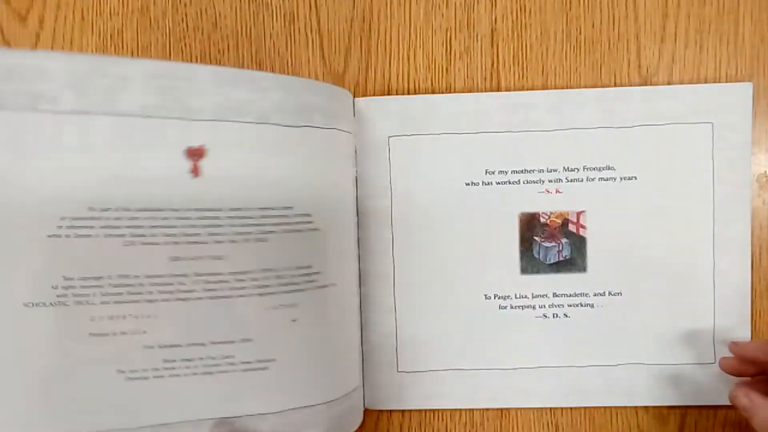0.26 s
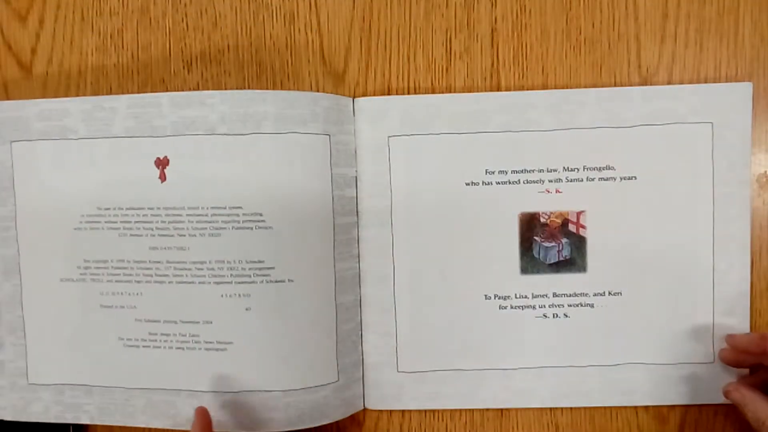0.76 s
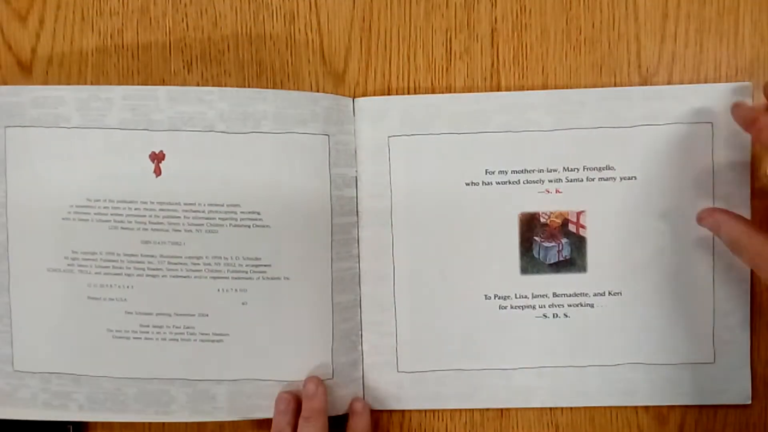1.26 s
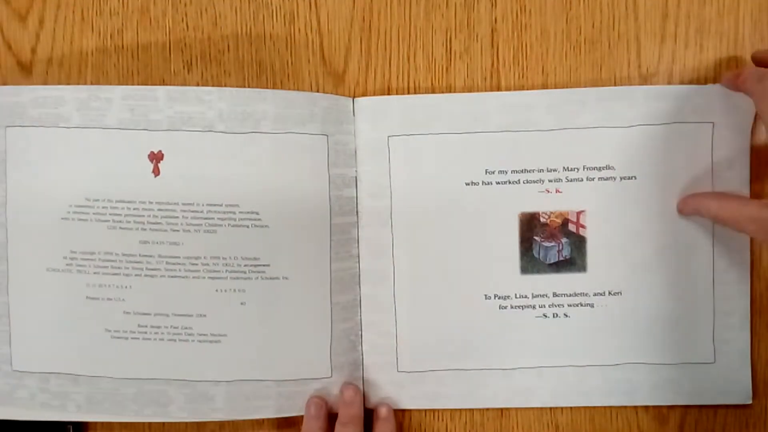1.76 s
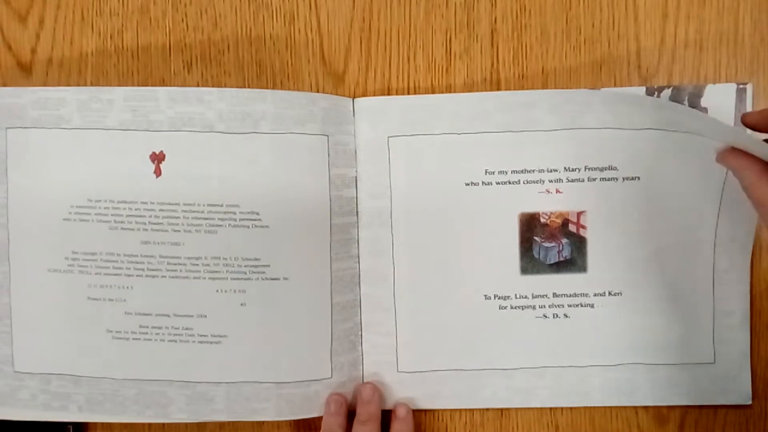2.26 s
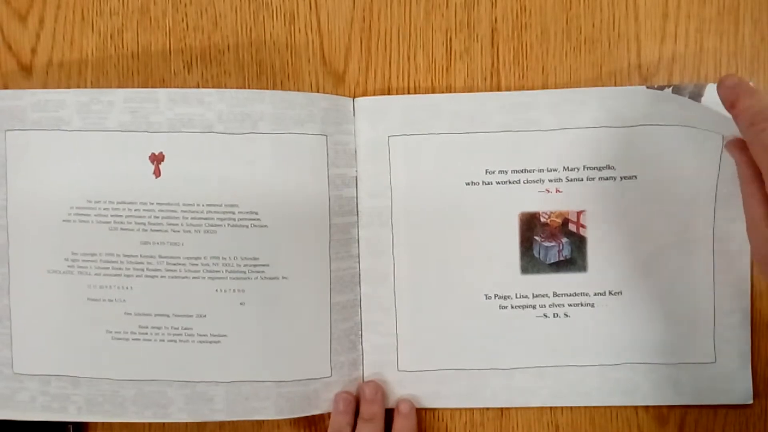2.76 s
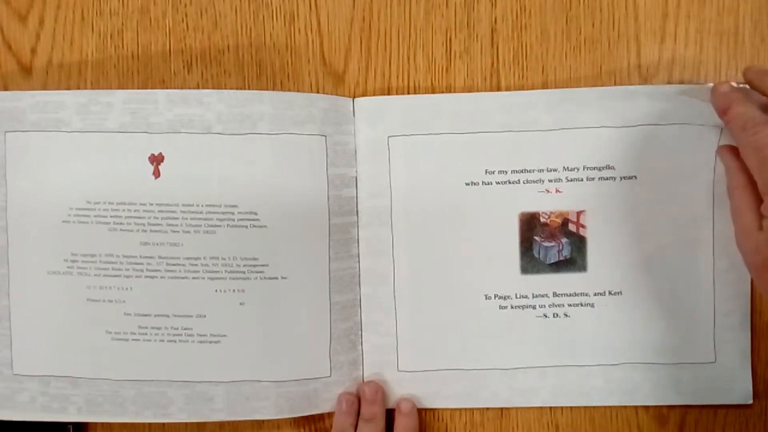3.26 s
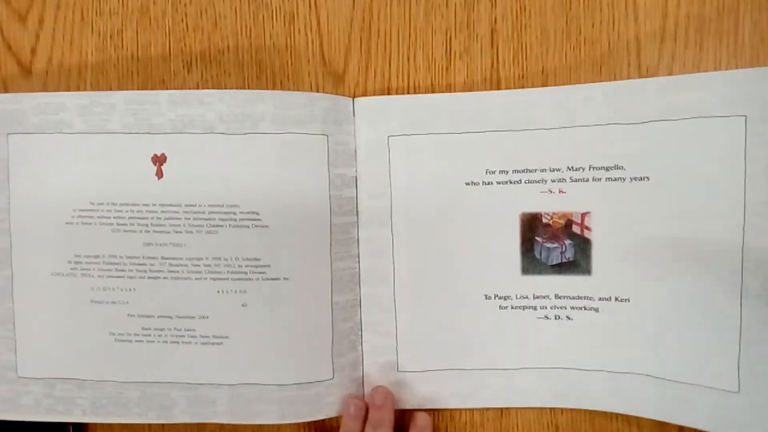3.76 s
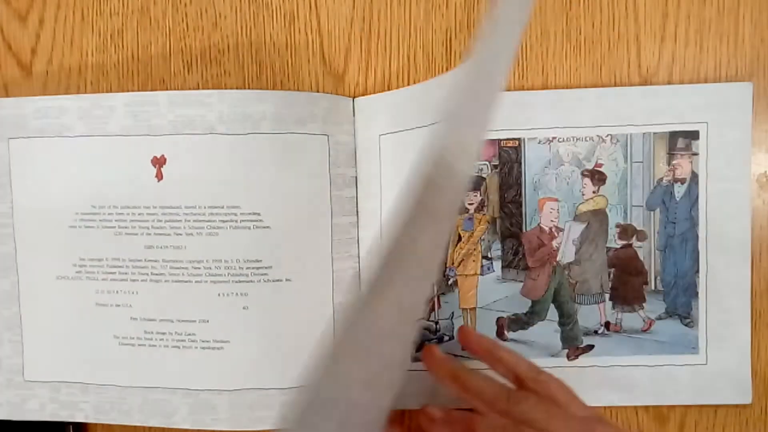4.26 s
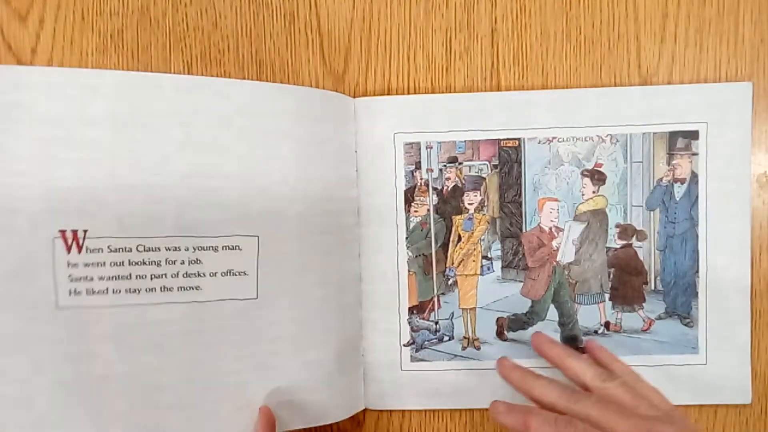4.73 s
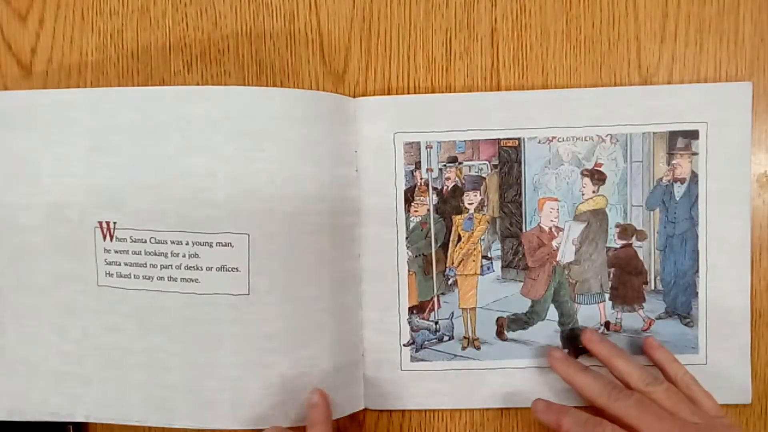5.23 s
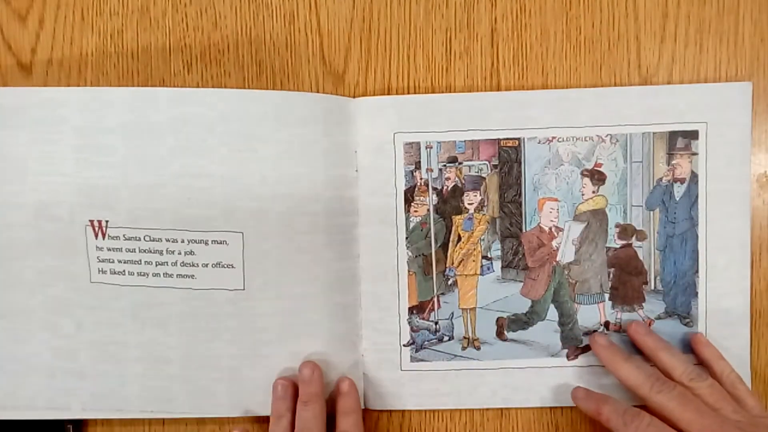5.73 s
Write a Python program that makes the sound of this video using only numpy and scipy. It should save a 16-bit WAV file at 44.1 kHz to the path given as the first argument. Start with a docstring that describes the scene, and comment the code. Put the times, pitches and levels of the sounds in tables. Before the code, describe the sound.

A small quiet room, with a phone microphone close above a book on a wooden table; faint steady hiss and a short soft room tail. A barely audible paper glide opens, then a crisp snap and flutter at 0.7 s as a page settles. Another light flick and scrape come at 1.1 s, followed by soft hand strokes until about 1.9 s, with a very faint low hum. From 2.0 s fingertips scrape in short dry scratches; two dull taps with papery clicks land at 2.67 and 2.72 s. Little rubs and scratches follow around 3.0-3.3 s, and the corner rasps sharply free at 3.5 s. From 3.7 s the sheet drags with grainy hiss and crackles, buckles with deeper flaps around 4.0-4.1 s and flutters to 4.4 s. A swish rises into the loudest, bright slap at 4.93 s, then light smoothing hisses at 5.35 and 5.8 s.

```python
"""Faint room air and a soft gliding hiss come first; then flutters, scrapes, knocks and slaps of paper.
The pages of a picture book are turned on a wooden table in a quiet room, close to a phone's microphone.
Stick-slip friction gives the hiss and scrapes, dispersive bending waves the buckling and slapping sheet,
damped modes the knocks, and short random grains the catches. The book colours the friction and the sheet,
the table reflects the contacts, and the room adds a short tail."""
import sys
import numpy as np
from scipy import signal
from scipy.fft import rfft, irfft
from scipy.io import wavfile
from scipy.ndimage import uniform_filter1d, map_coordinates

SR = 44100
rng = np.random.default_rng(int(sys.argv[2]) if len(sys.argv) > 2 else 0)


def transcribe(u):
    """Save the signal u as a 16-bit wav file named by the first command-line argument.

    u: samples, shape (n,) or (channels, n), limited to [-1, 1]; the rate is SR.
    q: integer samples, one column per channel.
    """
    v = np.clip(np.atleast_2d(u).T, -1, 1)
    q = np.round(v * 32767).astype(np.int16)
    wavfile.write(sys.argv[1], SR, q)


N = 264114
TIME = np.arange(N) / SR  # s
FREQ = np.maximum(np.arange(N // 2 + 1) * SR / N, 1)  # Hz

# spectrum of the quiet background: [f/Hz, level/dB]
QUIET_SPECTRUM = [(20, -36), (50, -3), (90, -2.5), (420, -6), (900, -7.5), (1800, -14.5), (3700, -14),
                  (5000, -4.5), (6000, -16), (10600, -7.5), (13500, -16.5)]
QUIET_DB = -63.5
# a faint low hum swells and fades, before its random wavering: [t/s, f/Hz, level/dB]
HUM_COURSE = [(1.36, 85, -89), (1.43, 83.5, -72.5), (1.9, 90.4, -68.5), (3.3, 91.2, -89)]
# resonances of the open book: [f/Hz, width/Hz, lift/dB]
BOOK_RESONANCES = [(897, 370, 4.5), (1102, 260, 2), (1635, 110, 4), (2040, 470, 6), (2980, 130, 5)]

# spectrum of gliding paper: [f/Hz, level/dB]
GLIDE_SPECTRUM = [(50, -30), (330, -15.5), (650, -18.5), (1200, -12.5), (4000, -8), (4900, 4), (6000, -14),
                  (7300, -7), (8600, -18.5), (10800, -11.5), (11900, -32.5)]
# a sheet slides over its neighbour, swelling and dying away:
# [peak t/s, hiss level/dB, rise/s, fall/s, body re hiss/dB, hiss pitch f/Hz]
SHEET_SLIDES = [(0.13, -61.5, 0.32, 1, -12, 4840), (0.535, -58, 0.06, .15, -9.5, 4947),
                (0.678, -46, .08, 0.036, -16, 5150), (2.278, -56.5, 0.37, 0.21, -7, 4910),
                (2.971, -49.5, 0.12, 0.22, -15, 4990), (3.345, -49, .12, .028, -18.5, 4700),
                (3.639, -51.5, .14, 0.27, -7.5, 4860), (3.9, -46, 0.19, 0.2, -1.5, 4910),
                (4.149, -48, 0.15, 0.12, -9, 5144), (4.388, -62, 0.66, .11, -1.5, 4853),
                (4.735, -48, .075, .17, -26, 4760), (4.915, -35.5, 0.16, 0.06, -12.5, 4880),
                (5.22, -55, 0.34, 0.51, -25, 5024), (5.791, -54, .26, 0.094, -12, 5080)]
SLIDE_AIR_DB, SLIDE_HZ = -7, 4847  # air re the mean of hiss and body; the band's pitch at rest
# a hand strokes the page flat or moves to its corner: [peak t/s, hiss level/dB, rise/s, fall/s]
HAND_STROKES = [(0.68, -47.5, 0.056, 0.055), (1.22, -49, 0.16, 0.17), (1.48, -56.5, 0.29, 0.26),
                (1.66, -57.5, 0.15, 0.27), (1.89, -57.5, .16, 0.19), (2.35, -59, .15, 0.075),
                (3.86, -52.5, 0.21, 0.3), (4.925, -49, 0.069, 0.056), (5.03, -58.5, 0.11, 1),
                (5.357, -49, 0.13, 0.079)]
STROKE_BODY_DB, STROKE_AIR_DB = -14.5, -6.5  # re hiss
STROKE_SPREAD = 0.53  # share of a stroke's power in the wide band
PAGE_HZ, PAGE_Q, PAGE_DB = 2720, 4.4, -16.5  # the page under the hand rings faintly; level re hiss
SWELL_DB, SWELL_ROUNDING = 19.5, 1.2  # gained over the rise, lost over the fall; 1 = a pointed top

# a fingertip rubs one spot of the page, which rings:
# [peak t/s, level/dB, rise and fall/s, resonance f/Hz, width/Hz]
SPOT_RUBS = [(.537, -64.5, .045, 2700, 700), (1.24, -63, .16, 2680, 650), (1.49, -67, 0.1, 1075, 130),
             (3.05, -46.5, 0.019, 3200, 1500), (3.084, -37.5, .011, 3550, 1300),
             (3.17, -56, .1, 5000, 1500), (3.175, -64.5, .11, 7470, 450), (3.33, -49, .06, 5350, 900),
             (3.88, -62, .2, 560, 650)]

# spectrum of the bending sheet: [f/Hz, level/dB]
SHEET_SPECTRUM = [(150, -9.5), (600, 0.5), (1850, -2.5), (2550, -8), (3600, -10), (5000, 10), (6300, -16.5),
                  (10800, -0.5), (14000, -29.5)]
# the slack sheet buckles or settles: [t/s, level/dB, ring time/s, thin below f/Hz]
SLACK_FLAPS = [(.634, -46, 0.042, 1400), (.682, -47.5, 0.024, 1100), (1.075, -49.5, 0.032, 890),
               (1.108, -42, 0.04, 950), (4.012, -39.5, 0.024, 260), (4.08, -32.5, 0.024, 119.5),
               (4.159, -49, 0.042, 400), (4.243, -41.5, 0.041, 350), (4.304, -41, 0.041, 460),
               (4.393, -44.5, 0.038, 497), (4.754, -55.5, 0.028, 608), (4.943, -33, 0.023, 780)]
FLAP_CROSSINGS = 8.4  # times a 1 kHz wave crosses the bend within its ring time
FLAP_CYCLES = 40.3  # a wider bend rings longer and duller: cycles of its top frequency within the ring time
# a taut edge snaps or the sheet slaps down:
# [t/s, level/dB, travel time of a 1 kHz wave/s, ring time/s, thin below f/Hz, dull above f/Hz]
TAUT_SNAPS = [(0.679, -31.5, 0.0059, 0.009, 1000, 10000), (1.0574, -36.5, 0.0002, 0.006, 700, 5500),
              (2.6713, -34, 0.00042, 0.0046, 900, 2200), (2.718, -26.5, 0.00014, 0.004, 900, 8000),
              (4.3087, -38.5, 0.00011, 0.004, 2500, 10000), (4.934, -29, 0.004, 0.007, 1300, 10500),
              (4.9355, -20.5, 0.0035, 0.013, 900, 5800)]

# spectrum of a scraped edge: [f/Hz, level/dB]
SCRAPE_SPECTRUM = [(180, -44.5), (300, -23.5), (1020, -23), (1730, -5), (2320, -13.5), (2610, -6.5),
                   (3810, -7), (4960, -2), (6460, -13.5), (10800, -19), (15500, -50)]
# fingertips and page edges scraping:
# [t/s, length/s, initial hiss level/dB, body re hiss/dB, air re hiss/dB, edge resonance f/Hz]
EDGE_SCRAPES = [ (1.06, 0.063, -45.5, -2.5, 0, 5000), (2.022, 0.02, -46.5, -1, -13, 5030),
                (2.042, 0.12, -41, -1, -12.5, 5200), (2.166, 0.11, -49.5, -2, -16, 2775),
                (2.247, 0.037, -42.5, -1, -16, 4840), (2.534, 0.011, -38.5, 0.5, -5.5, 5300),
                (2.672, 0.0077, -39, -3.5, -0.5, 5400), (2.715, 0.14, -39, -0.5, -3.5, 5340),
                (2.905, 0.075, -43.5, -1, -8.5, 4860), (3.028, 0.031, -45, -8.5, -13, 2930),
                (3.076, 0.011, -40, -6, -11, 3900), (3.314, 0.048, -43, -12.5, -10, 4700),
                (3.478, 0.025, -43, -2.5, -12, 4130), (3.522, 0.18, -45, 1.5, -2, 4660),
                (3.968, 0.019, -50.5, 4, -14.5, 2400), (4.073, 0.046, -44.5, 0.5, -8, 2400),
                (4.521, 0.0075, -51.5, -6, -13.5, 2350), (4.935, 0.0069, -27, 6, -8, 3100)]
SCRAPE_FADE_DB_PER_S = 112.5  # the pressure eases as a stroke goes on

# a fingertip knocks on the stack of pages: [t/s, level/dB, share of the full ring time]
FINGER_KNOCKS = [(2.672, -25.5, 1), (2.7178, -21, .75)]
# modes of the stack: [f/Hz, level/dB, full t60/s]
STACK_MODES = [(700, -1, 0.011), (1720, -4, 0.011)]

# the flexing sheet crackles: [t/s, level/dB]
FIBRE_CRACKLES = [(2.93, -36), (3.318, -39), (3.8, -38), (3.912, -37), (4.441, -51.5)]

# the corner slips from under the fingertip: it lets go at SLIP_S, after a build-up and a moment at full force
SLIP_S, SLIP_BUILD_S, SLIP_HOLD_S, SLIP_RELEASE_S = 3.519, 0.0078, 0.025, 0.0026
SLIP_DB, SLIP_BODY_DB, SLIP_AIR_DB, SLIP_EDGE_HZ = -27, -7.5, -6, 4500

# the lifted sheet drags over the next in small, uneven catches: [peak t/s, level/dB, rise/s, fall/s]
CATCHING_DRAGS = [(3.81, -44, .075, .25), (4.14, -48, 0.13, .1)]
CATCHES_PER_S, CATCH_HZ, CATCH_SPREAD_OCTAVES = 1500, 4905, .09
CATCH_RING_S, CATCH_SCATTER_DB = 0.0012, 2.5

TOP_HZ = 15650  # upper limit of the phone


def undb(db):
    """Level law: decibels to amplitude gain."""
    return 10 ** (np.asarray(db) / 20)


def unit(x):
    """Normalisation: scale to rms 1."""
    return x / np.sqrt(np.mean(x ** 2))


def curves(table):
    """Linear interpolation: the columns of a table joined by straight lines in time."""
    s, *columns = np.transpose(table)
    return [np.interp(TIME, s, c) for c in columns]


def gains(points, f):
    """Spectral interpolation: dB against log frequency, as gain at the frequencies f."""
    hz, db = np.transpose(points)
    return undb(np.interp(np.log(f), np.log(hz), db))


def book(f):
    """Resonance: gain of the book's summed bell-shaped lifts at the frequencies f."""
    return undb(sum(db / (1 + (2 * (f - hz) / width) ** 2) for hz, width, db in BOOK_RESONANCES))


def colour(x, gain):
    """Minimum phase: a causal filter with the given gain in each bin, by folding the cepstrum."""
    cepstrum = irfft(np.log(gain + 1e-7), len(x))
    cepstrum[1:len(x) // 2] *= 2
    cepstrum[len(x) // 2 + 1:] = 0
    return irfft(rfft(x) * np.exp(rfft(cepstrum)), len(x))


def walk(rate):
    """Smoothed random steps, at the given rate per second: a wavering of rms 1."""
    k = max(int(SR / rate), 1)
    steps = np.repeat(rng.standard_normal(N // k + 1), k)[:N]
    return unit(uniform_filter1d(steps, k))


def swell(peak_s, db, rise_s, fall_s):
    """Contact speed as level: gain of a contact that speeds up to a peak and slows again."""
    distance = np.maximum((peak_s - TIME) / rise_s, (TIME - peak_s) / fall_s)
    return undb(db - SWELL_DB * distance ** SWELL_ROUNDING)


def friction(gain, slips_per_s, scatter_db, grip_db, grip_rate):
    """Stick-slip: fibres slip in tiny clicks, bunched by the changing grip; returns body, hiss and air bands."""
    size = undb(scatter_db * np.minimum(rng.exponential(size=N), 4))
    clicks = (rng.random(N) < slips_per_s / SR) * rng.choice([-1, 1], N)
    slips = clicks * size * undb(grip_db * walk(grip_rate))
    spectrum = rfft(colour(slips, gain))
    body = 1 / (1 + (FREQ / 3800) ** 12)
    air = 1 / (1 + (5800 / FREQ) ** 20)
    return np.array([unit(irfft(spectrum * share, N)) for share in (body, 1 - body - air, air)])


def table_echo(x, lag_s=.0012, spread=.7, strength=0.34):
    """Comb interference: the table mirrors a stroke from a random distance, which ripples its colour."""
    lag = int(SR * lag_s * np.exp(spread * rng.uniform(-1.01, 1)))
    return x + strength * np.pad(x, (lag, 0))[:len(x)]


def shifting(x, hold_s=.13):
    """Changing interference: each moment has its own pair of reflections, fading into the next."""
    hop = int(hold_s * SR)
    padded = np.pad(x, (hop, 2 * hop))
    out = np.zeros(len(padded))
    for i in range(0, N + hop, hop):
        moment = padded[i:i + 2 * hop] * np.hanning(2 * hop)
        out[i:i + 2 * hop] += table_echo(table_echo(moment))
    return unit(out[hop:hop + N])


def bent_edge(rub, edge_hz, edge_q=4.2, edge_gain=0.99):
    """Forced resonance: rubbing rings the bent edge just above the table; the energy is kept."""
    edge = signal.lfilter(*signal.iirpeak(edge_hz, edge_q, fs=SR), rub)
    out = table_echo(rub + edge_gain * edge)
    return out * np.sqrt(np.sum(rub ** 2) / np.sum(out ** 2))


def background():
    """Stationary noise and a wavering tone: steady room air and microphone hiss, with the low hum."""
    air = unit(colour(rng.standard_normal(N), gains(QUIET_SPECTRUM, FREQ)))
    hz, db = curves(HUM_COURSE)
    phase = 2 * np.pi * np.cumsum(hz * (1 + 0.0082 * walk(5.4))) / SR
    hum = unit(np.sin(phase))
    return undb(QUIET_DB) * air + undb(db + 2.24 * walk(11)) * hum


def glide():
    """Light stick-slip over a broad contact: a fine, grainy hiss that barely stirs the book's resonances."""
    slide_powers = np.array([swell(*row[:4]) for row in SHEET_SLIDES]) ** 2 + 1e-18
    body_db, hz = np.transpose(SHEET_SLIDES)[4:]
    sheet = np.sqrt(slide_powers.sum(0))
    sheet_body = np.sqrt(undb(body_db) ** 2 @ slide_powers)
    skin = np.sqrt(sum(swell(*row) ** 2 for row in HAND_STROKES))

    gain = gains(GLIDE_SPECTRUM, FREQ) * np.sqrt(book(FREQ))
    bands = friction(gain, slips_per_s=8000, scatter_db=2.0, grip_db=1.38, grip_rate=200)
    body, hiss, air = map(shifting, bands)
    # paper on paper sings in a narrow band; reading it faster or slower sets its power-weighted pitch
    read_at = np.cumsum(hz @ slide_powers / sheet ** 2 / SLIDE_HZ)
    hiss = map_coordinates(hiss, [read_at], mode="mirror")
    # skin, the airier contact, spreads that band wide
    wide_filter = signal.butter(2, [4400, 7000], "band", fs=SR)
    wide = shifting(signal.lfilter(*wide_filter, rng.standard_normal(N)))
    page = unit(signal.lfilter(*signal.iirpeak(PAGE_HZ, PAGE_Q, fs=SR), rng.standard_normal(N)))

    hiss_gain = np.hypot(sheet, skin * np.sqrt(1 - STROKE_SPREAD))
    body_gain = np.hypot(sheet_body, skin * undb(STROKE_BODY_DB))
    air_gain = np.hypot(np.sqrt(sheet * sheet_body) * undb(SLIDE_AIR_DB), skin * undb(STROKE_AIR_DB))
    skin_sound = skin * (np.sqrt(STROKE_SPREAD) * wide + undb(PAGE_DB) * page)
    return hiss_gain * hiss + skin_sound + body_gain * body + air_gain * air


def rubs():
    """Noise-driven resonance: skin drags on the page and each spot answers with its own pitch."""
    out = np.zeros(N)
    for peak_s, db, length, hz, width in SPOT_RUBS:
        spot = signal.butter(2, [hz - width / 2, hz + width / 2], "band", fs=SR, output="sos")
        ringing = unit(signal.sosfilt(spot, rng.standard_normal(N)))
        out += swell(peak_s, db, length, length) * ringing
    return out


def flaps(steepness=4.45, onset=0.04, damping=1.19, size=16384):
    """Dispersion: bending waves bounce between the edges at a speed growing as root f, so lows come late."""
    out = np.zeros(N + size)
    t = np.arange(size) / SR
    f = np.maximum(np.arange(size // 2 + 1) * SR / size, 1)
    slack = [(s, db, ring / FLAP_CROSSINGS, ring, thin_hz, FLAP_CYCLES / ring)
             for s, db, ring, thin_hz in SLACK_FLAPS]
    # reading the echoes on a square-root frequency axis delays each by sqrt(1 kHz / f)
    warped_bins = (2 * np.sqrt(1000 * f) * 8 * size / SR).astype(int)
    for start, db, travel, ring, thin_hz, dull_hz in TAUT_SNAPS + slack:
        age = np.maximum(t - travel, 0) / ring
        bounces = rng.standard_normal(size) * np.minimum(age / onset, 1) * np.exp(-age ** damping)
        waves = rfft(bounces, 8 * size)[warped_bins]
        # a small patch radiates no bass, a gentle bend no treble
        radiated = 1 / np.sqrt((1 + (thin_hz / f) ** 4) * (1 + (f / dull_hz) ** (2 * steepness)))
        flap = colour(irfft(waves), gains(SHEET_SPECTRUM, f) * book(f) * radiated)
        i = int(start * SR)
        out[i:i + size] += flap * undb(db) * np.sqrt(ring * SR / 2 / np.sum(flap ** 2))
    return out[:N]


def scrapes(bands, rise_s=0.0072, release_s=0.0035):
    """Coarse stick-slip: an edge or fingertip drags in short strokes that ring the bent edge until release."""
    out = np.zeros(N)
    for start, length, db, body_db, air_db, edge_hz in EDGE_SCRAPES:
        t = np.arange(int((length + 10 * release_s) * SR)) / SR
        stroke = np.minimum(t / rise_s, 1) * np.exp(-np.maximum(t - length, 0) / release_s)
        span = slice(int(start * SR), int(start * SR) + len(t))
        mix = undb([body_db, 0, air_db]) @ bands[:, span]
        rub = mix * stroke * undb(db - SCRAPE_FADE_DB_PER_S * t)
        out[span] += bent_edge(rub, edge_hz)
    return out


def knocks(thin_hz=290):
    """Damped modes: the stack answers with a short, dead thud; a finger that stays down damps it further."""
    out = np.zeros(N)
    t = TIME[:SR // 4]
    for start, level_db, ring in FINGER_KNOCKS:
        i = int(start * SR)
        for hz, db, t60 in STACK_MODES:
            decay = np.exp(-np.log(1000) * t / (t60 * ring))
            out[i:i + len(t)] += undb(level_db + db) * decay * np.sin(2 * np.pi * hz * t)
    return signal.sosfilt(signal.butter(2, thin_hz, "high", fs=SR, output="sos"), out)


def crackles(bands, decay_s=0.0028, body_db=-13, air_db=-14):
    """Sudden yielding: a few fibres give way at once in a tiny burst of slips that dies straight away."""
    burst = sum(undb(db) * (TIME >= s) * np.exp(-np.abs(TIME - s) / decay_s) for s, db in FIBRE_CRACKLES)
    return undb([body_db, 0, air_db]) @ bands * burst


def slip(bands):
    """Friction and release: the corner's drag grows under the fingertip, rasps at full force and springs free."""
    early = np.maximum(SLIP_S - SLIP_HOLD_S - TIME, 0) / SLIP_BUILD_S
    release = np.exp(-np.maximum(TIME - SLIP_S, 0) / SLIP_RELEASE_S)
    force = undb(SLIP_DB - SWELL_DB * early) * release
    rasp = undb([SLIP_BODY_DB, 0, SLIP_AIR_DB]) @ bands * force
    return bent_edge(rasp + 1e-18, SLIP_EDGE_HZ)


def catches():
    """Random impulses: the edge catches and lets go; every catch is a grain with its own pitch and size."""
    t = TIME[:SR // 100]
    grains = np.zeros(N + len(t))
    envelope = t * np.exp(-t / CATCH_RING_S * 2)
    starts = np.flatnonzero(rng.random(N) < CATCHES_PER_S / SR)
    for i, (pitch, size) in zip(starts, rng.standard_normal((N, 2))[starts]):
        hz = CATCH_HZ * 2 ** (CATCH_SPREAD_OCTAVES * pitch)
        grains[i:i + len(t)] += undb(CATCH_SCATTER_DB * size) * envelope * np.sin(2 * np.pi * hz * t)
    return unit(grains[:N]) * sum(swell(*row) for row in CATCHING_DRAGS)


def room(x, t60_s=0.22, wet_db=-18, dull_hz=6000, gap_s=0.01):
    """Reverberation: exponentially decaying noise as the short, soft tail of the furnished room."""
    tail = rng.standard_normal(N) * (TIME > gap_s) * np.exp(-np.log(1000) * TIME / t60_s)
    tail = colour(tail, 1 / np.sqrt(1 + (FREQ / dull_hz) ** 2))[:SR]
    return undb(wet_db) * signal.fftconvolve(x, tail / np.sqrt(np.sum(tail ** 2)))[:N]


def scene():
    """Superposition: all the paper sounds, their room tail and the background."""
    coarse_gain = gains(SCRAPE_SPECTRUM, FREQ) * book(FREQ)
    coarse = friction(coarse_gain, slips_per_s=4500, scatter_db=1.8, grip_db=-1.0, grip_rate=1000)
    paper = glide() + rubs() + flaps() + scrapes(coarse) + knocks()
    paper += crackles(coarse) + slip(coarse) + catches()
    return (paper + room(paper) + background())[None]


def record(dry):
    """Band limiting: the phone cuts the top with a steep elliptic low-pass."""
    return signal.sosfilt(signal.ellip(10, .2, 70, TOP_HZ, fs=SR, output="sos"), dry)


dry = scene()
out = record(dry)
transcribe(out)
```